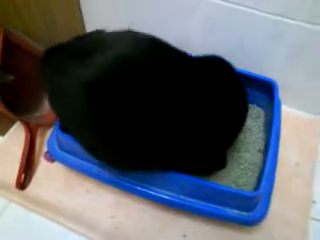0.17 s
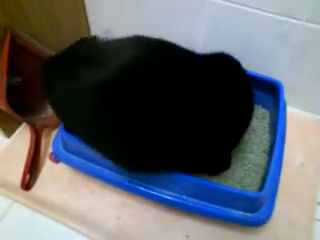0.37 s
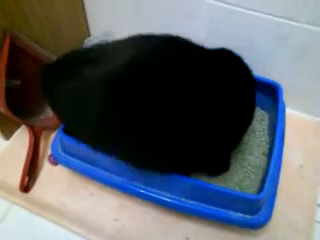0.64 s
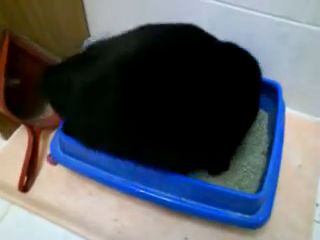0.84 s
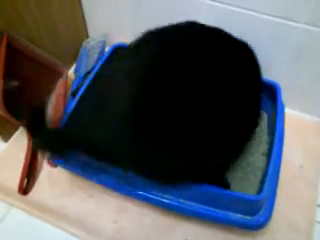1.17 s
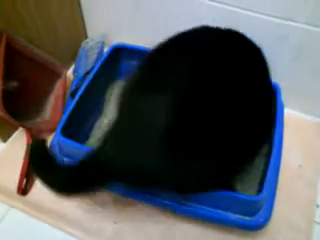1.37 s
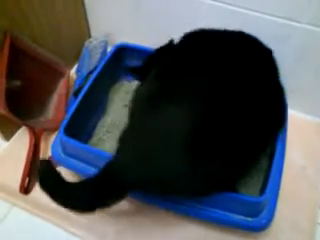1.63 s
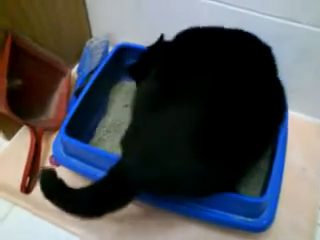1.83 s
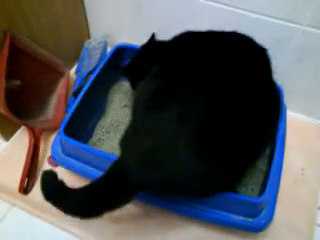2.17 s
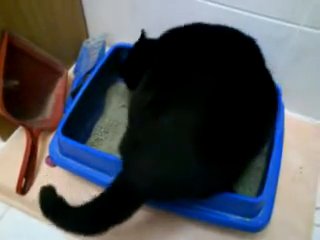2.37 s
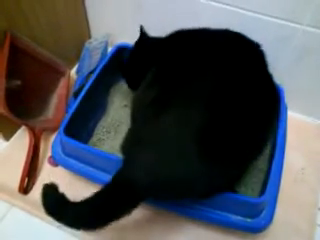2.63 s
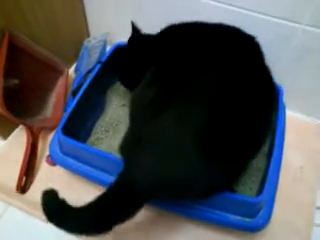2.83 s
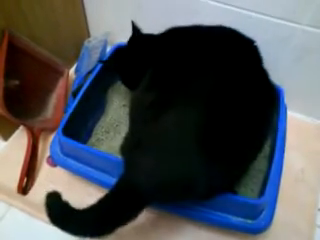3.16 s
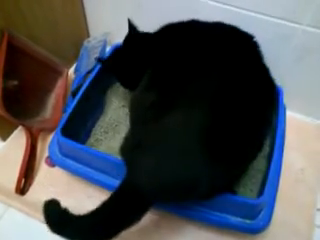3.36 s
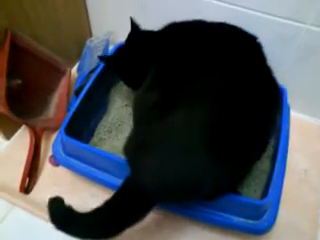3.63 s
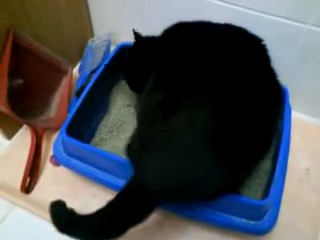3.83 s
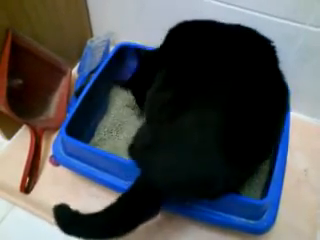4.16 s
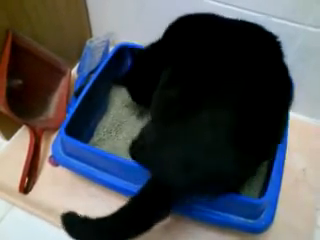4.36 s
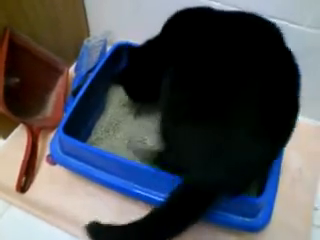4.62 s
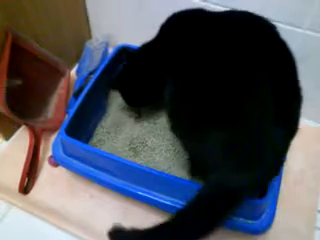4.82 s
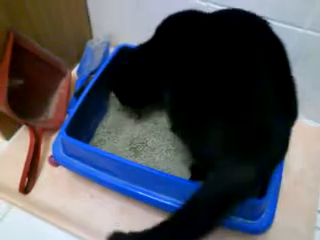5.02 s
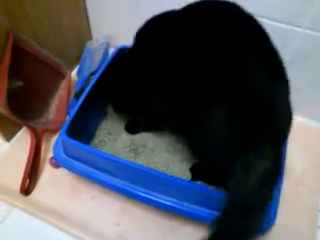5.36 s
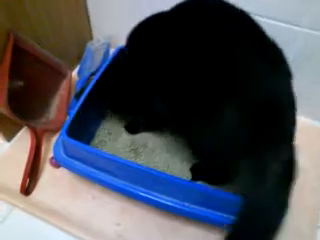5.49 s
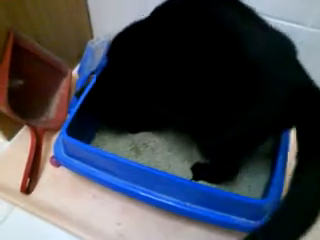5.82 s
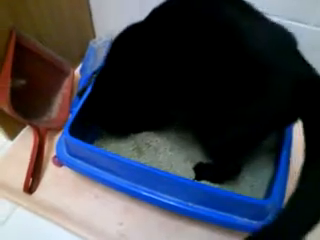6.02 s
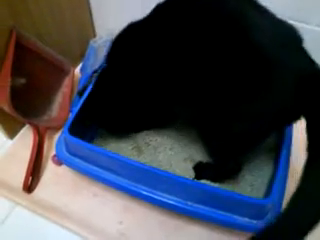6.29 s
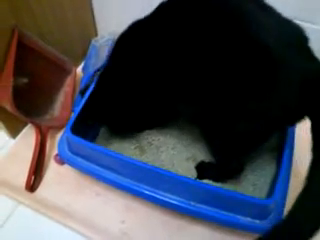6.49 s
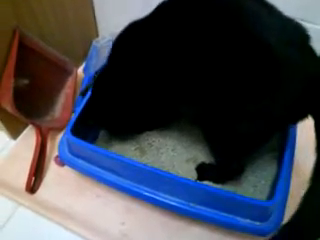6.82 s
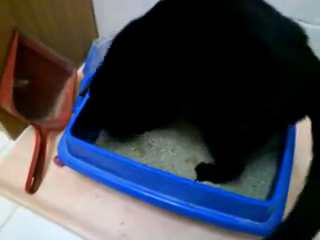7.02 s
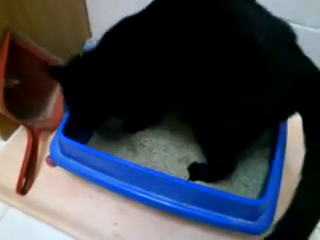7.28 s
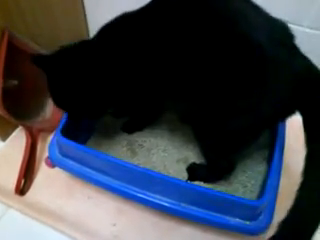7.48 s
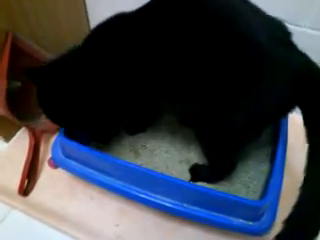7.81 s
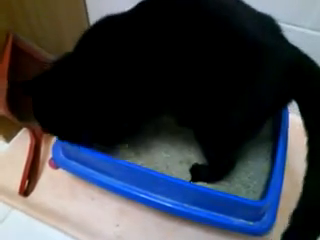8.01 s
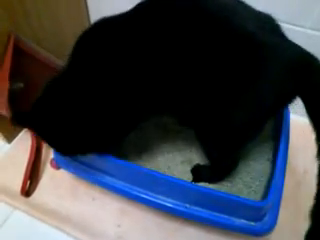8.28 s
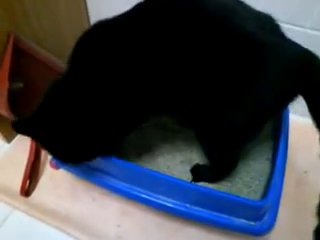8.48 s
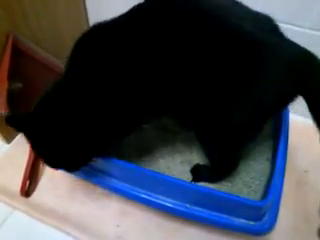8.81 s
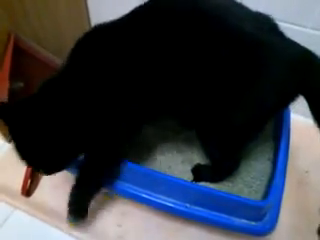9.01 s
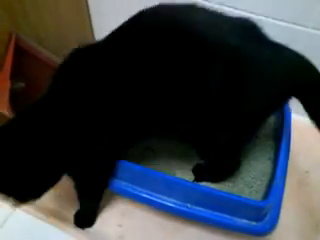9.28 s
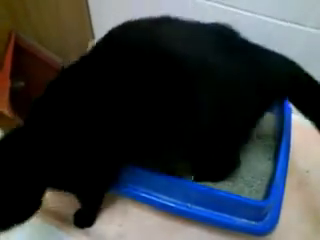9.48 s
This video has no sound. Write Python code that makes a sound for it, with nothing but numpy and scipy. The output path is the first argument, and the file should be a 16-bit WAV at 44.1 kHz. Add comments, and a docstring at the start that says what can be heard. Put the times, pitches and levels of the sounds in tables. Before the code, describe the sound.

A cat moves in a plastic tray of coarse clay litter, heard close by in a small tiled room over steady soft hiss. From 0 to 1.7 seconds there are faint grain rustles, light scrapes near 0.35 and 0.95, and a low crunch of shifting weight around 1.2 to 1.4. A dull pop comes at 1.73. From 1.8 to 3.7 seconds digging is vigorous: gritty strokes drum on the hollow tray, claws rake its walls near 2.3, 2.8 and 3.3, and hard knocks punctuate around 2.7 and 3.15. It then falls nearly quiet until 5, with tiny ticks and low rumble. Small scrapes and a stronger pop at 5.26 follow. A loud scratch and clack land at 6.4, more strokes at 6.7 to 6.9, and a sharp knock at 7.0. Softer scrapes around 8 fade to quiet, with faint grains and slight movement after 9.2.

```python
"""A small tiled room, a small camera microphone near a plastic tray: a cat digs in coarse clay litter.
Pushed grains, drawn as clumped random taps, drum on the tray and tick on each other;
the floor, walls, rim and corners of the tray answer each tap as briefly ringing damped sines.
Claws and thrown grains knock on the plastic, a few dull pops have no ring,
and behind it all lie a steady filtered-noise hiss and a low rumble that comes and goes."""
import sys
import numpy as np
from scipy import signal
from scipy.fft import rfft, irfft
from scipy.io import wavfile
from scipy.ndimage import uniform_filter1d

SR = 44100
rng = np.random.default_rng(int(sys.argv[2]) if len(sys.argv) > 2 else 0)


def generate_wav(signal):
    """Clip the signal to [-1, 1] and save it as 16-bit WAV at the path in sys.argv[1]."""
    frames = np.transpose(np.atleast_2d(signal))
    scaled = np.clip(frames, -1, 1) * 32767
    pcm = np.round(scaled).astype(np.int16)
    wavfile.write(sys.argv[1], SR, pcm)


def volts_from_db(level):
    """Convert decibel levels to linear amplitude ratios."""
    exponent = np.asarray(level, float) / 20
    return 10 ** exponent


N = 425609

# resonances of the tray's parts and of the loose grit: (f/Hz, width/Hz, relative level/dB)
TRAY_FLOOR = [(481, 34.6, 3), (559, 43, 1), (641.3, 42, 5.5), (719.4, 43, 4.5), (822, 163, -0.5)]
TRAY_WALLS = [(1345, 200, 1), (1520, 168, 2), (1705, 72, -3.5)]
TRAY_RIM = [(941, 62, -0.61), (1047, 38, 1), (1206, 120, -2.4)]
TRAY_CORNERS = [(1825, 92, 3.5), (1981, 59, 6), (2152, 230, -3)]
GRIT = [(2340, 1030, -1), (3540, 480, 0.5), (3915, 330, 1), (4650, 380, -2), (5270, 620, -5.5),
        (6560, 800, -12.5)]


def evened(x):
    """Scales to rms 1."""
    return x / np.sqrt(np.mean(x ** 2) + 1e-20)


def read(points, hz):
    """Reads a table on a log-frequency axis."""
    f, value = np.transpose(points)
    return np.interp(np.log(hz + 1), np.log(f + 1), value)


def force(t, s, hold_s, level_db, rise, fall):
    """Power of one push: climbs, holds from s on, dies away, at steady rates in dB a second."""
    before_s = np.maximum(s - t, 0)
    after_s = np.maximum(t - s - hold_s, 0)
    return volts_from_db(level_db - rise * before_s - fall * after_s) ** 2


def ring(modes):
    """A body's answer to one tap: damped sines of alternating sign, thinned below the lowest, energy 1."""
    t = np.arange(3000) / SR
    out = np.zeros(len(t))
    for k, (hz, width, db) in enumerate(modes):
        decay = np.exp(-np.pi * width * t)  # the wider the resonance, the sooner it dies
        out += (-1) ** k * volts_from_db(db) * width * decay * np.sin(2 * np.pi * hz * t)
    lowest_hz = modes[0][0]
    out = signal.lfilter(*signal.butter(2, 0.82 * lowest_hz, "high", fs=SR), out)
    return out / np.linalg.norm(out)


def hiss():
    """Steady noise of room and microphone, heavier in the bass: white noise shaped by a spectrum."""
    # spectrum of the hiss: (f/Hz, relative level/dB per Hz)
    spectrum = [(12, -56.5), (20, -2), (190, -14.5), (349, -17.5), (843, -29), (1310, -29), (4550, -31.5),
                (6900, -36.5), (8970, -85.5), (15200, -120)]
    hz = np.fft.rfftfreq(N, 1 / SR)
    shaped = rfft(rng.standard_normal(N)) * volts_from_db(read(spectrum, hz))
    return volts_from_db(-51) * evened(irfft(shaped, N))


def rumble():
    """Low rumble through the ground: noise around 45-100 Hz that swells and dies."""
    # swells of the rumble: (t/s, hold/s, level/dB)
    swells = [(4.63, .08, -57), (4.82, .03, -55), (5.023, 0.074, -52), (6.293, 0.14, -67),
              (9.35, 0.11, -56)]
    band = signal.butter(2, [45, 100], "band", fs=SR, output="sos")
    low = evened(signal.sosfilt(band, rng.standard_normal(N)))
    t = np.arange(N) / SR
    power = sum(force(t, *row, rise=117, fall=90) for row in swells)
    return np.sqrt(power) * low


def room(x):
    """Sparse echoes of random sign off the tiles, each band dying at its own speed."""
    # time for the echoes to fall by 60 dB: (f/Hz, T60/s)
    t60 = [(300, 0.42), (1500, 0.055), (5000, 0.11)]
    slots = np.arange(200, SR // 2, 20)  # one echo in every 20 samples
    taps = np.zeros(SR // 2 + 20)
    taps[slots + rng.integers(0, 20, len(slots))] = rng.choice([-1., 1.], len(slots))
    hz, t, bands = signal.stft(taps, SR, nperseg=256)
    dying = bands * volts_from_db(-60 * t / read(t60, hz)[:, None])
    tail = signal.istft(dying, SR, nperseg=256)[1]
    return signal.oaconvolve(x, tail / np.linalg.norm(tail))[:N]


def pops():
    """Dull pops with no ring: one push and one pull of air, a single cycle."""
    # the pops: (t/s, peak level/dB, f/Hz)
    table = [(.951, -29.5, 330), (1.487, -36, 400), (1.7278, -23, 800), (5.2578, -18.5, 720)]
    out = np.zeros(N)
    for s, peak_db, hz in table:
        u = (np.arange(N) / SR - s) * hz * 4.9 - 2.5
        out -= volts_from_db(peak_db) * u * np.exp((1 - u ** 2) / 2)
    return out


def knocks():
    """Claws and grains: a firm contact and a dying rattle drive the tray's ring, with a bright tick."""
    # single knocks: (t/s, peak level/dB, tick over the tray's ring level/dB, share on the walls 0-1,
    #                 rattle decay/s)
    table = [(.485, -42, 6, .3, .002), (1.316, -43, 5, .95, 0.02), (1.344, -37, 15, .5, .003),
             (1.432, -30, 0, 0.4, 0.0033), (1.727, -29, 0, 0, 0.00067), (1.758, -34, -10, 0.4, 0.0032),
             (2.14, -20, -6.5, 0.1, 0.0034), (2.448, -26, 2, 0.6, 0.0026), (2.564, -19, 11, .3, 0.0054),
             (2.667, -14.5, -20, 0.1, 0.0014), (2.671, -20, -20, 0.74, 0.011), (2.681, -23, 0, 0.4, 0.0033),
             (2.767, -29, -23, 0.8, 0.0028), (2.8, -28, -2, 0.1, 0.0042), (3.155, -16.5, -2, 0.92, 0.0017),
             (3.793, -34.5, -19, .7, 0.0017), (4.386, -35, -16, 0.26, 0.00051),
             (4.598, -35, -13, 0.85, 0.0076), (4.988, -29, -18, 0.3, 0.01),
             (5.259, -32.5, -14, 0.07, 0.005), (6.079, -28.5, -9, 0.5, 0.0059), (6.369, -12.5, 0, 1, 0.017),
             (6.398, -30, -5, 0.7, 0.0011), (6.423, -16, -2, 0.3, 0.0019), (6.666, -21.5, -16, 0.7, 0.0053),
             (6.817, -24.5, -21, 0.2, .0006), (6.927, -29, -6, 0.5, .003),
             (7.014, -12.5, -4.5, 0.16, 0.0013), (7.74, -36.5, -7, .5, 0.0062),
             (8.047, -26, -7, 0.15, 0.0024), (9.206, -30.5, 3.5, 0.5, 0.0032)]
    t = np.arange(3000) / SR
    damped = np.exp(-t / 0.0042)  # the paw stays down and damps the ring
    bodies = (TRAY_FLOOR, TRAY_WALLS, TRAY_CORNERS, TRAY_RIM, GRIT[2:])
    floor, wall, corner, rim, tick = (evened(ring(body) * damped) for body in bodies)
    out = np.zeros(N + SR)
    for s, peak_db, tick_db, walls, rattle_s in table:
        contact = rng.standard_normal(len(t))
        contact[0] = 7.4  # the firm first touch, the rest is rattle
        low_part = np.sqrt(1 - walls) * (floor + 0.47 * rim)
        high_part = np.sqrt(walls) * (wall + 0.97 * corner)
        body = low_part + high_part + volts_from_db(tick_db) * tick
        knock = signal.fftconvolve(contact * np.exp(-t / rattle_s), body)
        out[round(s * SR):][:len(knock)] += volts_from_db(peak_db) * knock / abs(knock).max()
    return out[:N]


def grains(per_s, spread_db, clump_db, clump_s):
    """Random taps of either sign; a few are large, and they come in clumps as the litter gives way."""
    size_db = spread_db * np.minimum(rng.exponential(1, N), 4)
    clumps = evened(uniform_filter1d(rng.standard_normal(N), round(clump_s * SR)))
    taps = np.sign(rng.standard_normal(N)) * (rng.random(N) < per_s / SR)
    return evened(taps * volts_from_db(size_db + clump_db * clumps))


def paw_strokes(t):
    """Powers of all drumming, of its share on the walls and of the grit, from settling and paw strokes."""
    # litter settling between strokes: (t/s, drumming level/dB)
    settling = [(0, -61), (.7, -57.5), (1.1, -61), (4.0, -65.5), (4.4, -58), (5.7, -60), (6.0, -54),
                (7.3, -60.5), (7.7, -65.5), (9.1, -64), (9.65, -56)]
    # paw scrapes that swell up, then digs that start abruptly, t at full force:
    # (t/s, hold/s, drumming level/dB, grit over drumming level/dB, share on the walls 0-1)
    scrapes = [(.35, 0.036, -47.5, -13, 0.44), (.963, 0.0037, -46, -8, 0.6), (1.315, 0.036, -47, -4, 0.23),
               (1.442, 0.02, -46, -2, 0.17), (1.86, 0.13, -33.5, -4, 0.38), (2.2, 0.086, -37.5, -6, 0.46),
               (2.455, 0.044, -33, -2.5, 0.18), (2.565, .01, -41, 10, 0.7), (2.81, 0.027, -33.5, -11, 0),
               (2.85, 0.017, -27, -2.5, 0.47), (2.96, 0.12, -35.5, -2.5, .2), (3.1, 0.038, -40.5, 7, 0.56),
               (3.18, 0.019, -35.5, 1, 0.4), (3.4, 0.038, -27, -4, 0.53), (3.55, 0.033, -38.5, -3, 0.16),
               (3.65, 0.01, -41, -0.5, 0.46), (4.25, 0.051, -61, -11, 0.4), (4.6, .02, -59, -0.5, 1),
               (4.995, 0.017, -43, -8.5, 0.47), (5.1, 0.026, -52, -8, 0.12), (5.25, 0.0083, -50, -5.5, 0.4),
               (5.46, 0.033, -48.5, -16, 0.45), (6.24, .02, -38.5, -8.5, .5), (6.51, 0.022, -54, -11, 0.66),
               (6.83, 0.0061, -39, -10, 0.53), (7.015, 0.021, -34, -1.5, 0.5),
               (7.885, .01, -56.5, -9, 0.05), (7.95, 0.046, -40.5, -6.5, 0.32),
               (8.04, 0.0067, -36.5, -8, 0.23), (8.4, 0.033, -60.5, 1.5, 0.13), (9.29, .03, -56, -7, 0.08),
               (9.5, .15, -55.5, -5.5, 0.44)]
    digs = [(1.24, .04, -54, -10, .1), (1.757, .03, -40, -8.5, .2), (2.14, 0.015, -52.5, 9.5, .12),
            (2.272, 0.009, -24.5, -14, 0.4), (2.295, 0.059, -27.5, -4, 0.43), (2.668, 0.012, -37, -5, 0.73),
            (3.31, 0.081, -35, -2, 0.44), (3.796, .005, -51, -8, 0.3), (5.8, 0.039, -44.5, -9, 0.11),
            (5.853, 0.008, -43, -4, 0.32), (6.096, 0.0081, -41, -5.5, 0.4),
            (6.374, 0.025, -25.5, -1.5, 0.63), (6.672, 0.018, -40.5, -7, 0.33), (6.928, .03, -35, -9, 0.17),
            (7.747, 0.047, -50.5, -6, 0.06)]
    grit_lag_s = 0.0049  # loose grit follows the paw
    drum = volts_from_db(np.interp(t, *np.transpose(settling))) ** 2
    wall = 0.22 * drum
    grit = drum * volts_from_db(-12) ** 2
    for strokes, rise, fall in ((scrapes, 136, 161), (digs, 799.5, 129)):  # dB/s
        for s, hold_s, level_db, grit_db, walls in strokes:
            push = force(t, s, hold_s, level_db, rise, fall)
            drum = drum + push
            wall = wall + walls * push
            grit = grit + force(t - grit_lag_s, s, hold_s, level_db + grit_db, rise, fall)
    return drum, wall, grit


def weight_shifts(t):
    """Powers of the deep crunch and of the tray's flexing as the cat shifts its weight."""
    # shifts, t at full load: (t/s, hold/s, deep crunch level/dB, flexing level/dB)
    shifts = [(0.94, 0.025, -62, -60), (1.23, 0.17, -47.5, -47.5), (6.13, 0.091, -57.5, -53),
              (7.95, 0.1, -58, -51)]
    rise, fall = 799.5, 161  # dB/s
    crunch = sum(force(t, s, hold_s, db, rise, fall) for s, hold_s, db, _ in shifts)
    load = sum(force(t, s, hold_s, db, rise, fall) for s, hold_s, _, db in shifts)
    return crunch, load


def raking(t):
    """Power of claws raking a wall, with a firm start and a clear stop."""
    # the rakes: (t/s, hold/s, level/dB)
    rakes = [(2.25, 0.079, -34), (2.768, 0.16, -34), (3.305, 0.16, -32.5), (4.24, 0.033, -59),
             (6.796, 0.068, -46)]
    return sum(force(t, *row, rise=902, fall=902) for row in rakes)


def digging():
    """Strokes, raking and weight drive grain taps into tray floor, walls, rim, corners, bed and grit."""
    # how near the rim the paws work: (t/s, extra ring of rim and corners level/dB)
    near_rim = [(0, 1), (1.3, 2.5), (1.8, 0), (3.9, 0), (5.1, -4), (6.0, 2.5), (6.4, -1), (7.7, 2),
                (9.65, 0)]
    # deep resonances of the flexing tray and of the litter bed: (f/Hz, width/Hz, relative level/dB)
    tray_flex = [(148.6, 7.5, 1), (224, 98, 0.0042)]
    litter_bed = [(265.7, 22, -0.7), (314, 47, -1), (432, 63, -6.5)]
    t = np.arange(0, N / SR, .001)
    drum, wall, grit = paw_strokes(t)
    crunch, load = weight_shifts(t)
    scraped_wall = wall + raking(t)
    near = volts_from_db(np.interp(t, *np.transpose(near_rim))) ** 2

    # the harder the push, smoothed over 0.18 s, the more the open tray wins;
    # each part: dB at a gentle push of -62 dB, plus change per dB of force
    harder_db = uniform_filter1d(10 * np.log10(drum), round(0.18 / t[1])) + 62
    bed = volts_from_db(-6 - 0.23 * harder_db) ** 2
    rim = volts_from_db(-2.5 - 0.34 * harder_db) ** 2
    corner = volts_from_db(0.44 - 0.17 * harder_db) ** 2
    flex = volts_from_db(-5 - 0.64 * harder_db) ** 2

    on_floor = grains(per_s=2000, spread_db=3., clump_db=1.0, clump_s=0.0091)
    on_walls = grains(per_s=2500, spread_db=1.0, clump_db=1.5, clump_s=0.0082)
    loose = grains(per_s=5000, spread_db=1.5, clump_db=2.0, clump_s=0.011)
    layers = [(abs(drum - wall), on_floor, TRAY_FLOOR),
              (scraped_wall, on_walls, TRAY_WALLS),
              (scraped_wall * corner * near, loose, TRAY_CORNERS),
              (drum * rim * near, loose, TRAY_RIM),
              (drum * bed + crunch, on_floor, litter_bed),
              (drum * flex + load, on_walls, tray_flex),
              (grit, 0.63 * loose + 0.59 * on_walls, GRIT)]
    out = np.zeros(N)
    for power, taps, body in layers:
        strength = np.interp(np.arange(N) / SR, t, np.sqrt(power))
        out += signal.oaconvolve(strength * taps, ring(body))[:N]
    return out


def scene():
    """Digging and knocks with their echoes, over the pops, the hiss and the rumble."""
    cat = digging() + knocks()
    return (cat + volts_from_db(-10.5) * room(cat) + pops() + hiss() + rumble())[None]


def low_pass(x):
    """Removes everything above the highest recorded frequency."""
    return signal.sosfilt(signal.butter(12, 7680, fs=SR, output="sos"), x)


def record(dry):
    """The microphone drops the deepest bass, then a steep band limit at 7150 Hz cuts the treble."""
    thin = signal.lfilter(*signal.butter(1, 30, "high", fs=SR), dry)
    edge = signal.firwin(401, 7150, window=("kaiser", 5.5), fs=SR)
    mix = signal.oaconvolve(thin, edge[None], "same")
    return low_pass(mix)


dry = scene()
out = record(dry)
generate_wav(out)
```